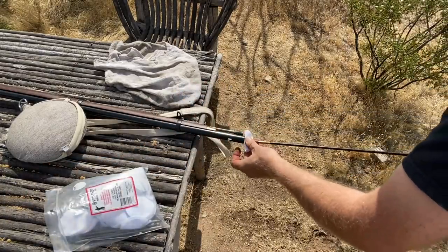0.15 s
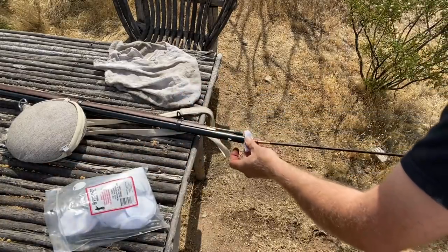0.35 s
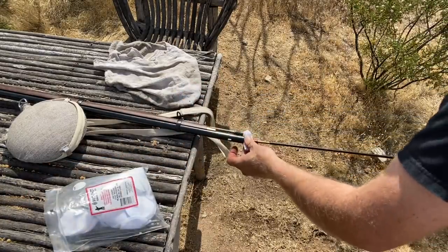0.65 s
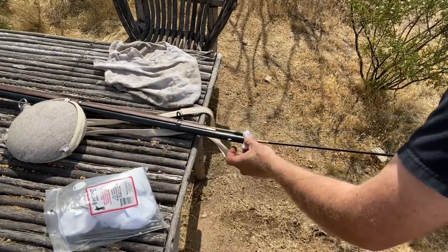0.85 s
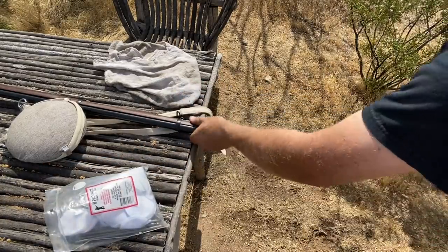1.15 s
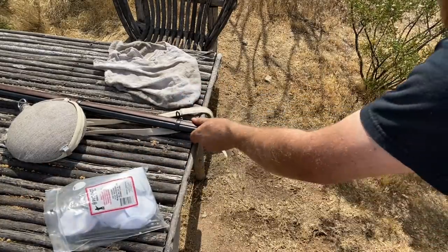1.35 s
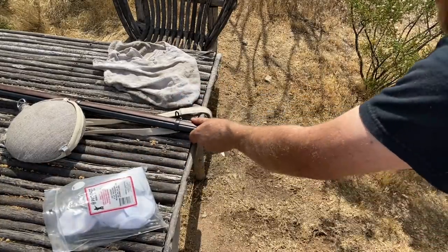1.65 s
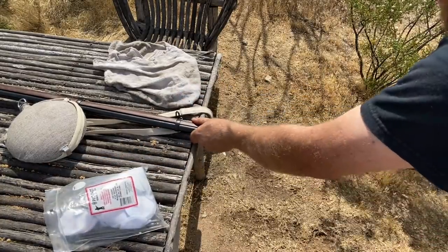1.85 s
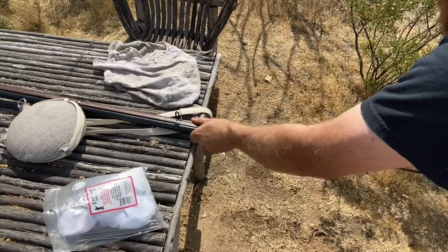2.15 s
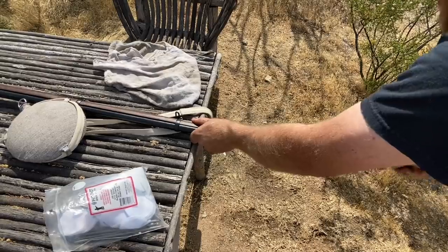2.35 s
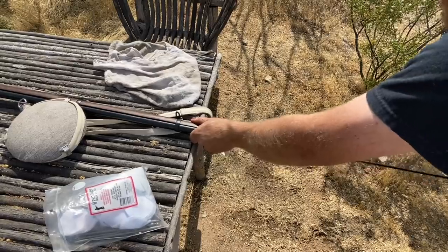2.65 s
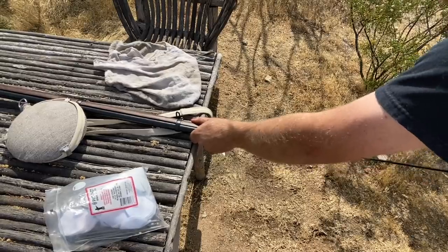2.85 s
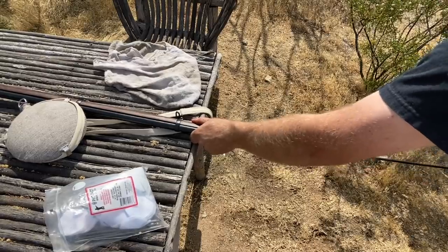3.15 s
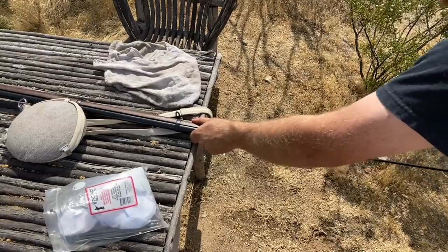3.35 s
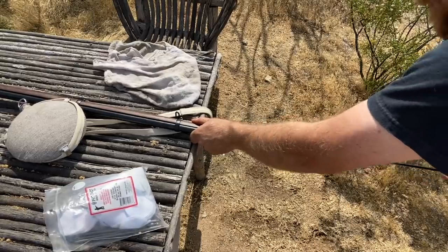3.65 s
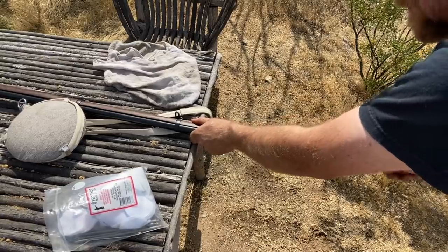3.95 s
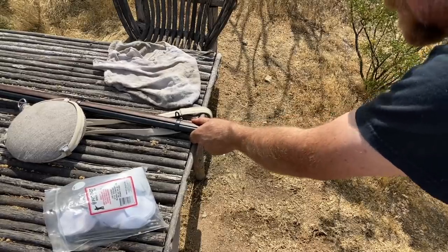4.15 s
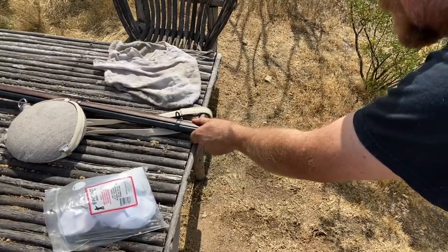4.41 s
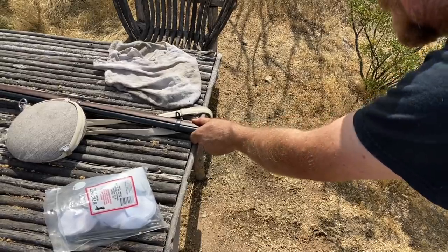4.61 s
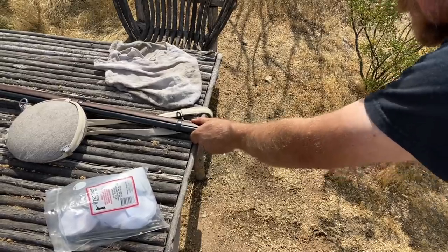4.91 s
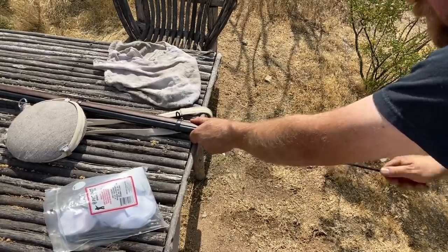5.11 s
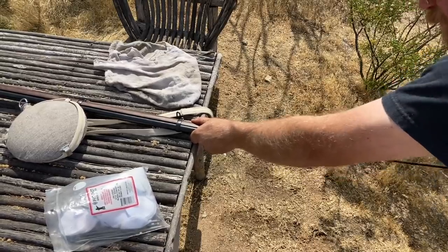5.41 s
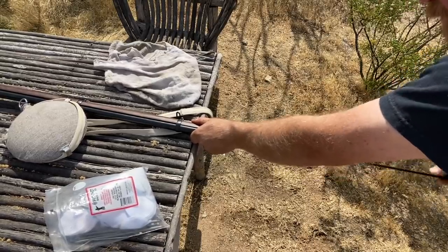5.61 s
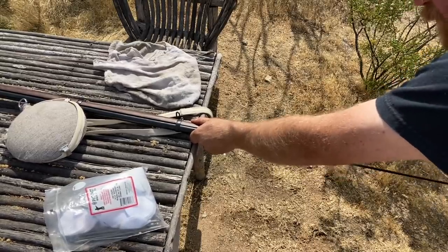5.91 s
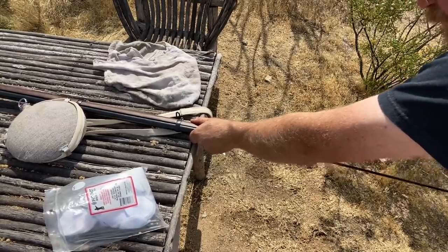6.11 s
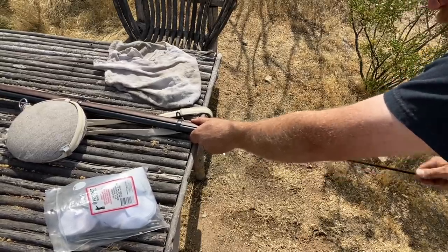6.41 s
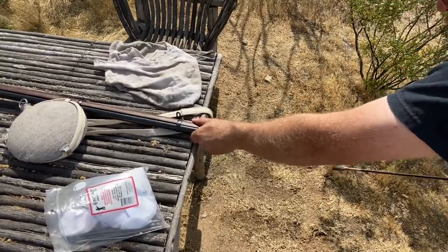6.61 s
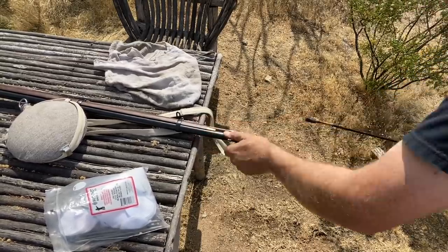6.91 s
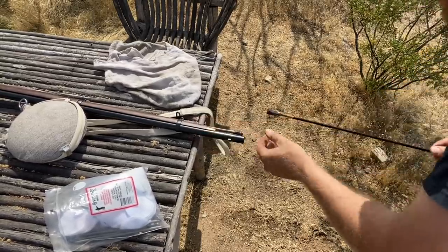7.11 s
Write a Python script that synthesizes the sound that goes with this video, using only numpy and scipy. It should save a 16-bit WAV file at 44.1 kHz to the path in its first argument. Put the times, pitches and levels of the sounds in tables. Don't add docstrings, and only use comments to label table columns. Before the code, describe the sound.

Outdoors, close to the microphone, a steel rod works a cloth patch inside a rifle barrel. Faint handling rustle and ticks come first, then a short jab, a rough chattering push and a long fading slide that ends in a bright hard clack. More scraping pulls follow, with small squeaks and snaps, until a very loud popping knock overloads the microphone. Low far rumble, motor hum and soft hiss stay underneath.

```python
import sys
import numpy as np
from scipy import signal
from scipy.fft import rfft, irfft
from scipy.io import wavfile
from scipy.ndimage import uniform_filter1d

SR = 44100
rng = np.random.default_rng(int(sys.argv[2]) if len(sys.argv) > 2 else 0)


def level_to_linear(level):
    exponent = np.asarray(level, float) / 20
    return 10 ** exponent


def wav_record(signal):
    frames = np.transpose(np.atleast_2d(signal))
    bounded = np.clip(frames, -1, 1)
    quanta = np.round(bounded * 32767).astype(np.int16)
    wavfile.write(sys.argv[1], SR, quanta)


N = 320342


def evened(x):
    return x / np.sqrt(np.mean(x ** 2) + 1e-20)


def add(mix, s, sound):
    part = mix[round(s * SR):][:len(sound)]
    part += sound[:len(part)]


def coloured(x, points):
    hz = np.fft.rfftfreq(len(x), 1 / SR)
    f, db = np.transpose(points)
    gain = level_to_linear(np.interp(np.log(hz + 1), np.log(f + 1), db, -100, -100))
    return evened(irfft(rfft(x) * gain, len(x)))


def band(x, low_hz, high_hz):
    edges_hz = [low_hz, min(high_hz, .45 * SR)]
    return signal.sosfilt(signal.butter(2, edges_hz, "band", fs=SR, output="sos"), x)


def lumps(count, seconds):
    size = max(int(seconds * SR), 1)
    return evened(uniform_filter1d(uniform_filter1d(rng.standard_normal(count), size), size))


def ringing(hz, db, t60, phase, count=4096):
    rate = (2j * np.pi * np.asarray(hz) - np.log(1000) / t60) / SR
    coarse = level_to_linear(db) * np.exp(np.arange(0, count, 64)[:, None] * rate + 1j * phase)
    fine = np.exp(rate[:, None] * np.arange(64))
    return (coarse @ fine).imag.ravel()[:count]


def resonate(x, hz, width_hz):
    turn = np.exp(2j * np.pi * np.cumsum(hz) / SR)
    r = np.exp(-np.pi * width_hz / SR)
    return 2 * (turn * signal.lfilter([1 - r], [1, -r], x / turn)).real


def columns(rows):
    s, *rest = np.transpose(rows)
    t = np.arange(s[0], s[-1], 1 / SR)
    return s[0], [np.interp(t, s, c) for c in rest]


# frequency in Hz, level in dB per Hz.
FAR = [(12, -63), (20, -31), (53, -14.5), (79, -3.5), (101, -2.5), (145, -7), (243, -10.5), (266, -19.5),
       (348, -27), (375, -34.5), (462, -32.5), (497, -25), (700, -32), (910, -75), (1540, -120)]
# frequency in Hz, level in dB per Hz.
HISS = [(180, -29), (300, -4.5), (372, -5.5), (461, -3.5), (492, -8), (968, -11.5), (1090, -12),
        (1970, -17), (15500, -28)]
# time in seconds, pitch in Hz, level in dB.
HUM = [(0, 103.5, -58.5), (0.451, 97, -53), (.62, 91.9, -65), (2.2, 121.6, -57.5), (4.3, 115.9, -64),
       (4.6, 89.5, -74.5), (7.26, 89.1, -71.5)]


def background():
    t = np.arange(N) / SR
    rumble = coloured(rng.standard_normal(N), FAR)
    rumble *= level_to_linear(-57.5 + 0.67 * lumps(N, .3) + 0.89 * lumps(N, .05))
    s, hz, db = np.transpose(HUM)
    turns = np.cumsum(np.interp(t, s, hz) * (1 + .03 * lumps(N, .06))) / SR
    motor = np.sin(2 * np.pi * turns) + 0.21 * np.sin(4 * np.pi * turns)
    hum = level_to_linear(np.interp(t, s, db) + 3 * lumps(N, .05)) * motor
    hiss = level_to_linear(-62.5 + 0.48 * lumps(N, .02)) * coloured(rng.standard_normal(N), HISS)
    return rumble + hum + hiss


def crackle(count, bright_db, dull_db):
    grains = rng.standard_normal(count)
    burst_db = 2.5 * np.minimum(rng.exponential(1, count), 5)
    grains *= level_to_linear(burst_db + 2.2 * lumps(count, 0.0014))
    bright = level_to_linear(bright_db) * evened(band(grains, 3300, 21000))
    return bright + level_to_linear(dull_db) * evened(band(grains, 650, 4900))


def rub(s, length_s, bright_db, dull_db):
    count = int(length_s * SR)
    return s, crackle(count, bright_db, dull_db) * signal.windows.tukey(count, .6)


# start in seconds, length in seconds, bright level in dB, dull level in dB.
RUBS = [(0.434, .02, -66, -71), (0.485, 0.039, -72, -68), (0.716, 0.022, -63, -72),
        (1.05, 0.064, -54, -47.5), (1.145, 0.078, -63, -55), (1.59, 0.062, -63, -59),
        (1.85, .015, -59.5, -61), (1.885, 0.046, -66, -52.5), (1.948, 0.033, -59, -62),
        (2.088, .012, -63, -74), (2.137, 0.048, -59, -53.5), (2.243, 0.029, -57, -51),
        (2.881, 0.025, -60, -51.5), (4.78, 0.077, -67, -54), (3.64, 0.17, -61.5, -75),
        (5.471, 0.06, -67, -57), (6.737, 0.038, -63, -55)]


def rubs(mix):
    for row in RUBS:
        add(mix, *rub(*row))


def bending(t60, chance):
    order = np.arange(10, 44) + .5
    hz = 7.5 * order ** 2 * (1 - 1.8e-5 * order ** 2)
    n = len(hz)
    mode_t60 = 1.4 * t60 * np.minimum(4800 / hz, 1) ** 1.1
    return ringing(hz, 5.7 * chance[:n], mode_t60, 0.69 * chance[n:2 * n])


# frequency in Hz, width in Hz, level in dB.
BARREL = [(781, 7.5, -12), (1118, 10, -8.5), (1365, 22, -0.5), (1560, 32, -2), (1810, 53, -11),
          (2200, 49, -18), (2310, 47, 2), (2650, 29, -17), (2820, 65, 0.5), (3120, 200, -7.5),
          (3860, 33, -12), (4700, 120, -13), (5323, 99, -15), (6430, 71, -36), (6850, 33, -47),
          (7005, 58, -50)]


def tap(s, peak_db, hz, upper_db, tick_db, fall_db_per_ms, bend_db):
    t, chance = np.arange(4096) / SR, rng.standard_normal((3, 4096))
    t60 = 0.077 / np.clip(fall_db_per_ms, .3, 20)
    grit = chance[0] * level_to_linear(-60 * t / (0.64 * t60)) * np.minimum(t / 0.0013, 1)
    steel = np.transpose(BARREL)[0] * (1 + 0.024 * chance[1, :len(BARREL)])
    dense = np.geomspace(500, 15500, num=60) * (1 + 0.028 * chance[1, 100:160])
    f = np.concatenate([[hz], steel, dense])
    mode_db = 1.8 * chance[1, 200:200 + len(f)] * (f != hz) + 7 * (f == hz)
    phase = np.pi * chance[1, 300:300 + len(f)]
    ring = ringing(f, mode_db, 1.04 * t60 * (2000 / f) ** .5, phase, count=2048)
    struck = evened(signal.fftconvolve(grit, ring)[:4096])
    struck = struck + level_to_linear(bend_db) * evened(bending(t60, chance[1, 500:]))
    z = rfft(np.roll(struck, 44))
    z /= np.sqrt(uniform_filter1d(abs(z) ** 2, size=45))
    colour = [(hz / 8, -60), (hz / 5.7, -20), (0.78 * hz, -5), (hz, 0),
              (max(3100, 0.82 * hz), 0.34 * upper_db), (4900, upper_db + 0.5),
              (9500, tick_db - 4.5), (16000, tick_db - 11)]
    body = coloured(irfft(z), colour)
    slats = level_to_linear(-16 - 60 * t / 0.141) * band(chance[2], 0.25 * hz, 1.3 * hz)
    sound = body / abs(body).max() + slats * np.minimum(t / 0.0018, 1)
    return s - .0009, level_to_linear(peak_db) * sound


def contacts(mix, taps, tick_re_upper_db, fall_db_per_ms, bend_db):
    for s, peak_db, hz, upper_db in taps:
        tick_db = upper_db + tick_re_upper_db
        add(mix, *tap(s, peak_db, hz, upper_db, tick_db, fall_db_per_ms, bend_db))


# start in seconds, peak in dB, strongest ring in Hz, upper ring in dB.
SNAPS = [
    (0.494, -49, 1350, -3),
    (2.28, -26.5, 1550, -15),
    (2.437, -22, 2490, -15.5),
    (4.804, -31, 2890, -18),
    (5.975, -39, 2720, -18),
    (6.0155, -22, 2560, -8),
]


def snaps(mix):
    contacts(mix, SNAPS, tick_re_upper_db=-23, fall_db_per_ms=4, bend_db=-7)


# start in seconds, level in dB, centre in Hz.
SNICKS = [(1.1733, -29, 6500), (1.2418, -26, 6000), (3.182, -21, 3600), (4.82, -19.5, 4600),
          (.4945, -32, 3300), (.517, -37, 2300), (.9185, -35, 2300), (1.118, -33, 2500), (1.39, -34, 3000),
          (1.629, -33, 6000), (1.593, -36, 2800), (.81, -35, 8500), (6.044, -31, 6500), (6.106, -29, 4500),
          (6.607, -31, 5000), (2.894, -31, 5500)]


def snicks(mix):
    for s, db, hz in SNICKS:
        click = band(np.eye(1, 200)[0], 0.55 * hz, 1.76 * hz)
        add(mix, s, level_to_linear(db) * band(click, .5 * hz, 4 * hz))


# time in seconds, dull level in dB.
RUSTLE = [(0.85, -71), (1.32, -61), (1.6, -66.5), (1.91, -54.5), (2.05, -59.5), (2.38, -55), (2.82, -61),
          (3.1, -62), (3.2, -78), (4.39, -52), (4.46, -46), (4.66, -80), (4.9, -59), (5.4, -53.5),
          (5.5, -61), (6.3, -57), (6.52, -53.5), (7.0, -74)]


def rustle(mix):
    s, (dull_db,) = columns(RUSTLE)
    count, bright_db = len(dull_db), .4 * dull_db - 43.5
    cloth = crackle(count, bright_db - 2.5, dull_db - 4)
    add(mix, s, cloth * signal.windows.tukey(count, .01))


# start in seconds, peak in dB, strongest ring in Hz, upper ring in dB.
RATTLES = [(0.916, -50, 1500, -19), (1.353, -27.5, 1411, -15), (2.902, -33, 1520, -31),
           (2.965, -27.5, 2810, -10), (3.184, -26, 1830, -26), (3.218, -27, 1520, -22),
           (3.294, -29, 2360, -30), (3.347, -31, 1540, -23), (3.402, -30.5, 1810, -26),
           (3.894, -30.5, 2650, -18), (4.523, -24, 2796, -20.5), (4.579, -32.5, 2390, -29),
           (4.782, -45, 845, -25), (4.974, -40, 1270, -23), (5.104, -34, 1800, -27), (5.149, -30, 781, -28),
           (5.273, -33, 2720, -28), (5.292, -25.5, 2230, -24), (5.331, -26.5, 2340, -36),
           (5.894, -31.5, 1817, -25), (5.949, -35.5, 3100, -20), (6.081, -36, 773, -23),
           (6.115, -34, 2330, -29), (6.173, -34, 1500, -37), (6.192, -51, 1530, -24),
           (6.208, -26.5, 2280, -19), (6.222, -24, 1560, -14), (6.24, -25.5, 1060, -13),
           (6.284, -28.5, 2400, -22.5), (6.624, -42, 3130, -13)]


def rattles(mix):
    contacts(mix, RATTLES, tick_re_upper_db=-21.5, fall_db_per_ms=1.89, bend_db=-5)


# start in seconds, peak in dB, strongest ring in Hz, upper ring in dB.
TICKS = [(0.953, -42.5, 1546, -30), (1.176, -52, 2820, -6), (1.243, -42, 2370, -10),
         (1.332, -39.5, 3170, -25), (1.492, -41.5, 2000, -29), (1.831, -43, 1986, -37),
         (2.032, -34, 2930, -26.5), (2.066, -41, 2302, -26), (2.232, -43.5, 2172, -15),
         (2.361, -32, 5500, -5), (2.499, -43.5, 1723, 14), (2.432, -34, 4500, -12), (2.661, -40, 2870, -21),
         (2.82, -41.5, 2870, -19), (2.883, -38, 2500, -18), (2.979, -27, 2420, -31),
         (3.099, -50, 2010, -35), (3.145, -37.5, 960, -38), (4.147, -31, 2760, -33),
         (4.674, -42, 2310, -36), (5.045, -36.5, 1810, -28), (6.508, -27, 920, -21)]


def ticks(mix):
    contacts(mix, TICKS, tick_re_upper_db=-7, fall_db_per_ms=2.7, bend_db=-6)


def thud(s, peak_db, hz, fall_db_per_ms):
    t, chance = np.arange(4096) / SR, rng.standard_normal((2, 4096))
    t60 = 0.087 / np.clip(fall_db_per_ms, .3, 20)
    push = chance[0] * level_to_linear(-60 * t / (.5 * t60)) * np.minimum(t / 0.0014, 1)
    ring = ringing(hz * np.array([.6, .8, 1, 1.3]), np.array([-4.5, -10, 6, -7.5]), t60, 0)
    body = band(signal.fftconvolve(push, ring)[:4096], .5 * hz, 3.3 * hz)
    return s, level_to_linear(peak_db - 3) * body / abs(body).max()


# start in seconds, peak in dB, pitch in Hz.
BUMPS = [
    (2.236, -41, 400),
    (2.515, -44, 400),
    (4.6, -46, 950),
    (1.075, -46, 620),
]


def bumps(mix):
    for row in BUMPS:
        add(mix, *thud(*row, fall_db_per_ms=1.2))


# start in seconds, peak in dB, strongest ring in Hz, upper ring in dB.
DRAGS = [(1.115, -45, 1760, -17), (2.148, -46, 3120, -2), (2.296, -28, 3200, -15),
         (2.549, -31, 2310, -20.5), (2.623, -40, 2500, -27), (2.776, -30.5, 1350, -8),
         (2.851, -36.5, 2297, -42), (3.631, -29.5, 1050, -27), (5.008, -31.5, 1700, -40),
         (5.469, -30, 2470, -6), (5.6605, -24, 2250, -18.5)]


def drags(mix):
    contacts(mix, DRAGS, tick_re_upper_db=-11, fall_db_per_ms=1.36, bend_db=3.5)


# start in seconds, pitch in Hz, level in dB, t60 in seconds.
PINGS = [(6.0146, 2191, -20, .022), (6.0146, 3165, -22, .022), (6.0146, 6200, -42, .04),
         (6.0146, 1373, -36, .048), (6.018, 781, -42, .07), (5.66, 2250, -27, .03), (5.66, 2859, -27, .03),
         (5.662, 5216, -42, .06), (5.662, 1599, -38, .08), (5.4682, 6200, -36, .015),
         (5.469, 2536, -34, .04), (5.469, 2837, -36, .058), (5.469, 2035, -37, .03),
         (5.4685, 4113, -40, .05), (2.978, 2390, -26, .04), (2.978, 2810, -31, .02),
         (2.776, 2900, -39, .03), (2.776, 5500, -43, .04), (2.78, 1400, -40, .04), (2.436, 2584, -24, .026),
         (1.353, 3144, -33, .019), (5.2915, 2300, -29, .02), (5.2915, 2900, -33, .015),
         (3.0585, 1200, -39, .015), (2.362, 2600, -40, .04)]


def pings(mix):
    rise = np.minimum(np.arange(4096) / SR / .0007, 1)
    for s, hz, db, t60 in PINGS:
        add(mix, s, ringing([hz], db, t60, 0) * rise)


# start in seconds, peak in dB, pitch in Hz.
THUDS = [
    (2.197, -39.5, 422),
    (2.362, -37.5, 458),
    (2.435, -34.5, 430),
    (2.55, -53, 781),
    (3.489, -41, 513),
    (3.631, -30, 660),
    (4.447, -28, 666),
    (4.524, -36, 717),
    (4.578, -38, 695),
    (5.663, -32.5, 780),
]


def thuds(mix):
    for s, peak_db, hz in THUDS:
        add(mix, *thud(s, peak_db, hz, fall_db_per_ms=1 + 0.5 * (peak_db + 39)))


def streaked(x, depth_db, size=9):
    z = signal.stft(x, nperseg=1024, noverlap=768)[2]
    patches = uniform_filter1d(rng.standard_normal(z.shape), 3, axis=0)
    patches = evened(uniform_filter1d(patches, size, axis=1))
    return evened(signal.istft(z * level_to_linear(depth_db * patches), nperseg=1024, noverlap=768)[1][:len(x)])


# frequency in Hz, level in dB per Hz.
SCRAPE = [(250, -17), (450, 1), (900, 3.5), (1800, -5), (3000, 3.5), (4500, -35), (6300, -37), (7500, -93),
          (12000, -60)]
# frequency in Hz, level in dB per Hz.
PATCH = [(250, -4), (500, -5.5), (1100, 0.5), (2400, -0.5), (4500, -4), (6500, -12), (8500, -19),
         (12000, -22), (16000, -35)]


def stroke(rows, grip_db, ring_db):
    s, (pressure_db, hz) = columns(rows)
    count, chatter = len(hz), np.clip((pressure_db + 52.5) / 28, .15, 1)
    grains = rng.standard_normal(count) * level_to_linear(2 * np.minimum(rng.exponential(1, count), 5))
    grains *= level_to_linear(chatter * 5.5 * lumps(count, 0.0023))
    grains /= np.sqrt(abs(uniform_filter1d(grains ** 2, size=2200)) + 1e-9)
    f, width_hz, db = np.transpose(BARREL)
    ring = ringing(f, db, 3.6 / width_hz, rng.uniform(0, 2 * np.pi, len(f)))
    rattle = evened(signal.fftconvolve(grains, ring)[:count]) + level_to_linear(-3) * coloured(grains, SCRAPE)
    rattle += level_to_linear(ring_db) * evened(resonate(resonate(grains, hz, 520), hz, 550))
    hiss = coloured(rng.standard_normal(count) * level_to_linear(0.75 * lumps(count, 0.007)), PATCH)
    hiss_db = grip_db + 0.53 * (pressure_db + 42) - pressure_db
    sound = np.sqrt(chatter) * streaked(rattle, 2.1)
    sound += level_to_linear(hiss_db + 15.5) * streaked(hiss, 3.5, size=20)
    return s, level_to_linear(pressure_db) * sound * signal.windows.tukey(count, min(0.016 * SR / count, 1))


# time in seconds, pressure in dB, moving rod ring in Hz.
STROKES = [
    [(2.27, -62, 3303), (2.295, -33, 3140), (2.315, -34.5, 2400), (2.355, -45, 2250), (2.365, -58, 2254)],
    [(3.14, -64, 1390), (3.172, -46, 1580), (3.19, -37.5, 1600), (3.24, -34, 1480), (3.292, -32, 2340),
     (3.332, -41, 2200), (3.4, -37.5, 1520), (3.45, -44, 1800)],
    [(3.38, -61, 1600), (3.45, -47, 1800), (3.57, -44.5, 2050), (3.64, -44, 1400), (3.68, -45, 1700),
     (3.84, -48, 2327), (4.04, -53.5, 1810), (4.24, -54.5, 2200), (4.425, -71, 1598)],
    [(4.86, -64, 1880), (5.004, -46.5, 1810), (5.156, -37, 1850), (5.255, -42, 1980), (5.338, -37, 2270),
     (5.384, -52, 2050), (5.41, -68, 1800)],
    [(6.07, -69, 1780), (6.118, -39, 2040), (6.154, -49, 1690), (6.222, -35.5, 1860), (6.296, -37, 2040),
     (6.33, -68, 1770)],
]
PATCH_GRIP_DB = [-64.5, -70.5, -60.5, -71.5, -73]
ROD_RING_DB = [22, -3., -7, -3, -6]


def strokes(mix):
    for row in zip(STROKES, PATCH_GRIP_DB, ROD_RING_DB):
        add(mix, *stroke(*row))


# start in seconds, peak in dB, strongest ring in Hz, upper ring in dB.
NICKS = [(3.192, -32, 1600, -22), (3.235, -26.5, 1500, -14), (3.264, -31, 1560, -18),
         (3.272, -27, 1300, -10), (3.278, -25, 2400, -18), (3.286, -31, 3000, -26), (3.315, -32, 2400, -22),
         (3.335, -38, 2600, -16), (3.38, -34, 1500, -12), (3.425, -38, 2000, -18), (4.797, -42, 2700, -15),
         (4.825, -41, 2500, -11), (5.076, -35, 3020, -16), (5.115, -35, 1800, -24), (5.162, -28, 2800, -20),
         (5.183, -32, 1900, -20), (5.231, -33, 1860, -18), (2.443, -28, 1500, -20), (5.306, -34, 2300, -22),
         (5.337, -29, 1600, -20), (5.358, -36, 2800, -22), (6.06, -46, 2470, -22), (6.262, -30, 1500, -18),
         (6.747, -41, 2650, -14), (6.751, -40, 3300, -12), (3.698, -39, 3000, -16), (3.723, -37, 2300, -20),
         (2.549, -40, 5300, 0)]


def nicks(mix):
    contacts(mix, NICKS, tick_re_upper_db=-24, fall_db_per_ms=5, bend_db=-5)


# frequency in Hz, level in dB, t60 in seconds.
TOCK = [(764, -35, .009), (1170, -20, 0.0083), (1500, -35, 0.0065), (2040, -25, 0.008),
        (4660, -35.5, 0.0047)]


def tock(mix):
    add(mix, 3.0535, band(band(ringing(*np.transpose(TOCK), 0), 540, 6500), 400, 7000))


# start in seconds, end in seconds, pitch in Hz, level in dB.
SINGS = [
    (5.05, 5.23, 2880, -48),
    (5.03, 5.1, 1860, -50),
    (5.07, 5.2, 4560, -57),
    (5.295, 5.35, 2300, -46),
    (3.2, 3.31, 3150, -47),
    (3.2, 3.3, 5300, -55),
    (5.19, 5.245, 1860, -50),
]


def sings(mix):
    for start, end, hz, db in SINGS:
        count = int((end - start) * SR)
        ring = rng.standard_normal(count) * level_to_linear(3 * lumps(count, .003))
        curve_hz = np.full(count, hz)
        ring = resonate(resonate(ring, curve_hz, 150), curve_hz, 150)
        add(mix, start, level_to_linear(db) * evened(ring) * signal.windows.tukey(count, .3))


def whistle(start, end, hz, db):
    count = int((end - start) * SR)
    turns = np.cumsum(hz * (1 + .004 * lumps(count, .004))) / SR
    return start, level_to_linear(db) * np.sin(2 * np.pi * turns) * signal.windows.tukey(count, .4)


# start in seconds, end in seconds, pitch in Hz, level in dB.
SQUEAKS = [
    (3.288, 3.304, 2320, -27.5),
    (5.068, 5.094, 781, -41),
    (5.108, 5.121, 1810, -36),
    (5.175, 5.189, 1960, -37),
]


def squeaks(mix):
    for row in SQUEAKS:
        add(mix, *whistle(*row))


# start in seconds, end in seconds, pitch in Hz, level in dB.
CHIRPS = [
    (3.422, 3.5, 7900, -73),
    (5.765, 5.803, 7850, -66),
    (5.8, 5.864, 7750, -67),
]


def bird(mix):
    for row in CHIRPS:
        add(mix, *whistle(*row))


# start in seconds, length in seconds, bright level in dB, dull level in dB.
SWELL = (3.58, .5, -67, -66)


def patch_bite(mix):
    add(mix, *rub(*SWELL))


# start in seconds, level in dB.
CLACK = [
    (4.4415, -44),
    (4.4466, -11),
    (4.4483, -15),
    (4.450, -9),
    (4.4517, -14),
    (4.4555, -21),
    (4.466, -34),
]
# frequency in Hz, level in dB, t60 in seconds.
BREECH = [(680, -22, 0.07), (1380, -11, 0.055), (1780, -10, 0.03), (2471, -2, 0.052), (2650, -4, .035),
          (2850, -5, .035), (3040, -4, 0.027), (3725, -9, .036), (4317, -11, .04), (4780, -12, .04),
          (5730, -11, .03), (9240, -18, 0.032), (10870, -24, .04), (11960, -23, .03)]


def clack(mix):
    start, t = CLACK[0][0], np.arange(4096) / SR
    chance, push = rng.standard_normal((len(CLACK) + 2, 4096)), np.zeros(6000)
    for (s, db), grit in zip(CLACK, chance):
        add(push, s - start, level_to_linear(db - 60 * t / 0.0012) * grit)
    z = rfft(push)
    push = irfft(z / np.sqrt(uniform_filter1d(abs(z) ** 2, size=25)))
    ring = signal.fftconvolve(push, ringing(*np.transpose(BREECH), 0))
    clatter = level_to_linear(-7 - 60 * t / 0.032) * band(chance[-2], 1000, 6000)
    clatter += level_to_linear(-17 - 60 * t / 0.11) * band(chance[-2], 700, 4000)
    add(ring, 0, signal.fftconvolve(push, clatter))
    direct = level_to_linear(9) * band(push, 1200, 6000) + level_to_linear(3) * band(push, 250, 1000)
    add(ring, 0, direct + level_to_linear(6) * band(push, 10000, 14500))
    add(mix, start, level_to_linear(-12) * band(ring, 420, 14500))


# frequency in Hz, level in dB, t60 in seconds.
KNOCK = [(87.5, -9.5, 0.1504), (271.8, -3.5, 0.1), (458, -6.5, 0.12), (546.4, -5, 0.11), (698, -12, 0.12),
         (735, -2.5, 0.083), (846, -23.5, 0.12), (914, -4, 0.068), (1030, -7.5, 0.15), (1110, -3, 0.12),
         (1294, -2.5, 0.11), (1200, -10, 0.089), (2037, -0.5, 0.074), (2140, -11, 0.047)]
# frequency in Hz, level in dB, t60 in seconds.
ROD = [(1550, -3, .06), (1917, -10, .05), (2860, -3, .05), (3080, -1, .045), (3330, -4, .04),
       (4480, -7.5, .04), (5870, -11, 0.041), (6270, -16, .03), (9400, -15, .03), (10700, -17, .025)]


def knock():
    pop_s, blow_s, bore_echo_s = 6.4088, 6.4148, .00546
    out, t = np.zeros(N), np.arange(12000) / SR
    hz, db, t60 = np.transpose(KNOCK)
    low = hz < 500
    t60 = t60 * np.interp(hz, [90, 270, 600], [1.65, 1.5, .68])
    boom = ringing(hz[low], db[low], t60[low], .7, count=12000)
    add(out, pop_s, level_to_linear(-6) * boom * np.minimum(t / 0.00088, 1))
    add(out, blow_s, level_to_linear(-5) * ringing(hz, db, t60, np.pi * low, count=12000))
    add(out, blow_s, level_to_linear(-8) * ringing(*np.transpose(ROD), 0))
    noise = rng.standard_normal((4, 12000))
    crack = band(noise[0], 790, 3600) + level_to_linear(-4) * band(noise[0], 4200, 6600)
    crack = (crack + level_to_linear(-6) * band(noise[0], 9500, 13000)) * level_to_linear(-60 * t / 0.027)
    leak = band(noise[3, :250] * t[:250] / .005, 800, 7000)
    add(out, pop_s - .004, level_to_linear(-36) * leak)
    add(out, pop_s + .002, level_to_linear(-6.5) * crack)
    for k in range(9):
        echo = band(crack, 300, 700 + 15000 * .52 ** k)
        add(out, blow_s + k * bore_echo_s, (-1) ** k * level_to_linear(7 - 6.4 * k) * echo)
    add(out, blow_s, level_to_linear(-1 - 60 * t / 0.085) * band(noise[1], 350, 3300))
    add(out, pop_s, level_to_linear(11 - 60 * t / 0.14) * band(noise[2], 110, 230))
    add(out, blow_s, level_to_linear(-23.5 - 60 * t / 0.22) * band(noise[3], 250, 4200))
    return band(out, 62, 19000)


def scene():
    mix = background() + knock()
    for layer in (strokes, rustle, thuds, tock, snicks, rubs, bird, ticks, rattles, drags, snaps, nicks,
                  clack, squeaks, bumps, pings, sings, patch_bite):
        layer(mix)
    return mix[None]


def roll_off(x):
    return signal.sosfilt(signal.butter(12, 15630, fs=SR, output="sos"), x)


def record(dry):
    clipped = np.clip(dry, -1, 1)
    return roll_off(clipped)


dry = scene()
out = record(dry)
wav_record(out)
```